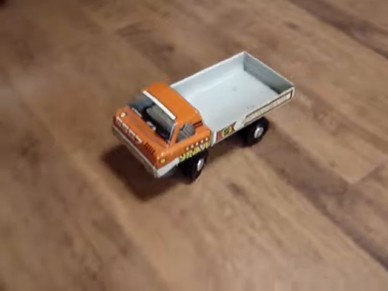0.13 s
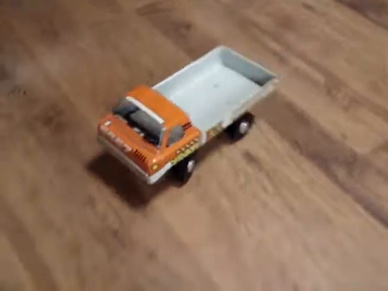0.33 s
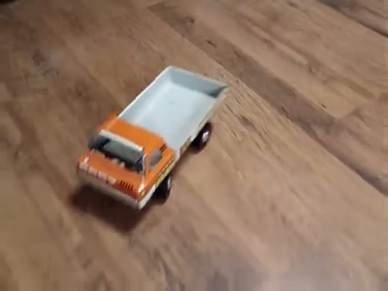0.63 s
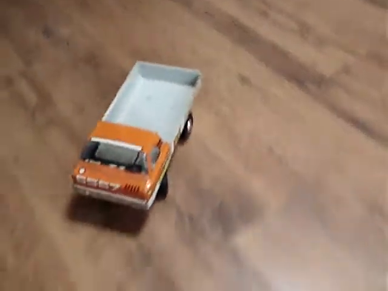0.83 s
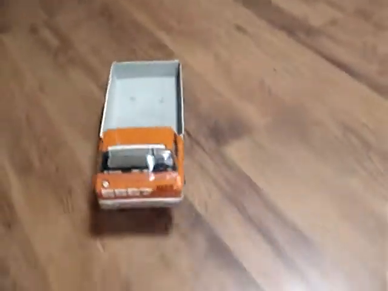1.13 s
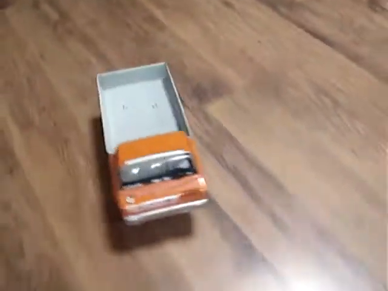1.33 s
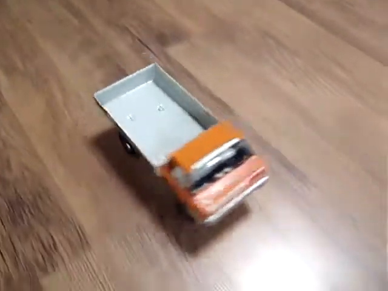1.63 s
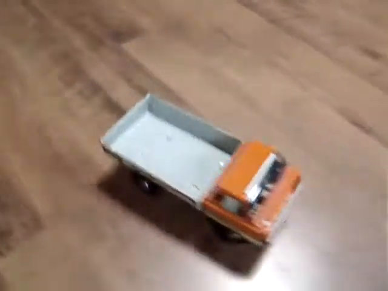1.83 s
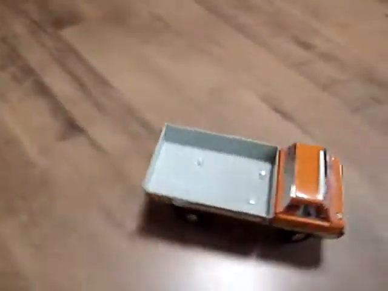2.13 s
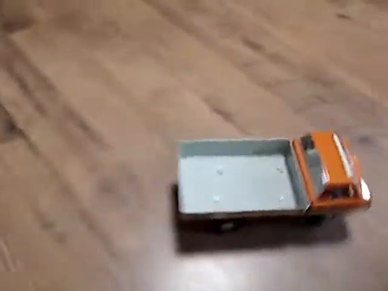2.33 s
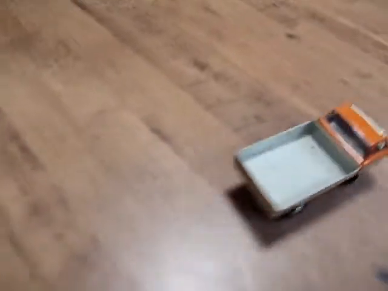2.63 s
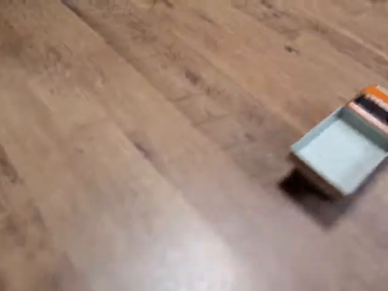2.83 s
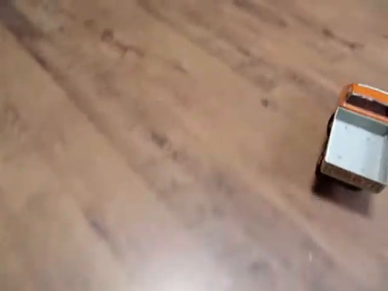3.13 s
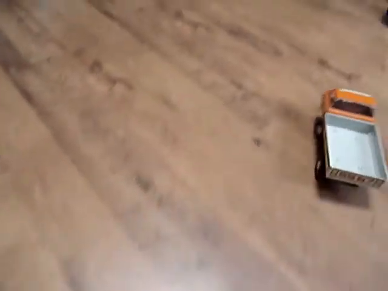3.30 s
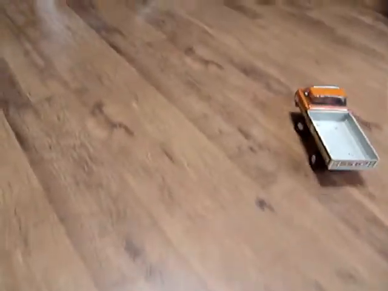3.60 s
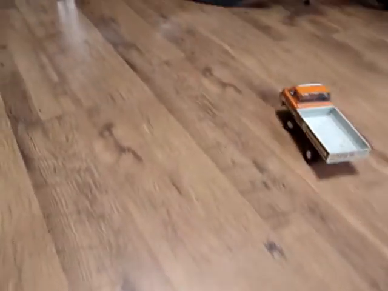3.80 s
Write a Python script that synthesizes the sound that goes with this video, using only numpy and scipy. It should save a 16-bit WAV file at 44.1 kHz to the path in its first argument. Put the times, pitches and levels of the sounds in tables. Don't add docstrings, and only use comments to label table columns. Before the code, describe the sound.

Steady clockwork whirr of a small tin truck, its hard wheels clattering over wooden boards.

```python
import sys
import numpy as np
from scipy import signal
from scipy.fft import rfft, irfft
from scipy.io import wavfile
from scipy.ndimage import uniform_filter1d

SR = 44100
rng = np.random.default_rng(int(sys.argv[2]) if len(sys.argv) > 2 else 0)


def output_pcm(signal):
    pcm = np.clip(np.atleast_2d(signal).T, -1, 1) * 32767
    wavfile.write(sys.argv[1], SR, np.round(pcm).astype(np.int16))


def volts_from_db(level):
    exponent = np.asarray(level, float) / 20
    return 10 ** exponent


N = 174636


def evened(x):
    return x / np.sqrt(np.mean(x ** 2) + 1e-20)


def coloured(x, points):
    hz, db = np.transpose(points)
    bins_hz = np.fft.rfftfreq(4096, 1 / SR)
    log_gain = np.interp(np.log(bins_hz + 1), np.log(hz), db) * np.log(10) / 20
    cepstrum = irfft(log_gain)
    cepstrum[1:2048] *= 2
    cepstrum[2049:] = 0
    impulse = irfft(np.exp(rfft(cepstrum)))
    return evened(signal.oaconvolve(x, impulse)[:N])


def wobble(seconds):
    size = max(int(seconds * SR), 2)
    noise = rng.standard_normal(N)
    return evened(uniform_filter1d(uniform_filter1d(noise, size), size))


def ring(drive, hz, width_hz):
    b, a = signal.iirpeak(hz, hz / max(width_hz, 25), SR)
    return evened(signal.lfilter(b, a, drive))


def knocks(per_s, spread_db):
    govern_s, govern_share = 0.02, 0.6
    chance, luck, side = rng.random((3, N))
    size_db = spread_db * np.minimum(-np.log(luck + 1e-9), 3.5)
    hits = evened((chance < per_s / SR) * np.sign(side - 0.5) * volts_from_db(size_db))
    force = abs(uniform_filter1d(hits ** 2, int(govern_s * SR)))
    return evened(hits / np.sqrt(govern_share * force + 1 - govern_share))


# frequency in Hz, level in dB.
TIN_COLOUR = [(500, -32), (900, 2.5), (1300, -1.5), (2500, 0), (2850, -7.5), (3500, -27), (4500, -37.5),
              (7000, -28.5)]


def tin_body(drive):
    return volts_from_db(-6) * coloured(drive, TIN_COLOUR)


# frequency in Hz, level in dB.
BOARD_COLOUR = [(30, -53.5), (170, -44.5), (260, -9.5), (380, 1.5), (550, 6), (850, 3), (1100, -1.5),
                (2500, -32.5)]


def floor_boards(drive, load):
    wheels = knocks(per_s=900, spread_db=2.5) * volts_from_db(0.5 * load) + 0.49 * drive
    return volts_from_db(-6.5) * coloured(wheels, BOARD_COLOUR)


# frequency in Hz, level in dB.
FIZZ_COLOUR = [(2400, -13), (3000, 0.5), (3950, -0.5), (4900, -11), (6800, -10), (8200, -7.5), (9400, -5.5),
               (10100, -25)]


def gear_fizz(load):
    ticks_db = 0.31 * load + 1.0 * wobble(0.0047)
    ticks = knocks(per_s=9000, spread_db=3.5) * volts_from_db(ticks_db)
    return volts_from_db(-14.5) * coloured(ticks, FIZZ_COLOUR)


# pitch in Hz, width in Hz, level in dB.
PANEL_MODES = [(395, 105, -23), (445, 49, -22.5), (515, 30, -22.5), (611, 22, -31), (743, 110, -21),
               (818, 15, -19.5), (1250, 180, -21), (1491, 120, -29), (1658, 20, -31.5), (1980, 35, -49),
               (2375, 240, -25.5), (2570, 73, -41), (3274, 120, -36), (3860, 28, -31)]
# centre in seconds, pitch in Hz, half length in seconds, level in dB.
PANEL_TURNS = [(0.296, 526, 0.33, -9), (0.135, 1480, 0.046, -13), (0.428, 780, 0.13, -16.5),
               (.49, 2330, .15, -20), (.51, 1980, 0.35, -17.5), (.6, 3200, 0.43, -37),
               (.64, 2570, 0.14, -21), (.8, 1570, 0.22, -23), (.87, 2315, 0.044, -12.5),
               (1.05, 3860, 0.38, -28), (1.023, 400, 0.18, -11), (1.018, 494, 0.087, -7.5),
               (1.103, 1742, 0.19, -16.5), (1.254, 2430, 0.11, -29), (1.35, 1520, 0.33, -15),
               (1.35, 520, 0.19, -24), (1.66, 2570, 0.27, -21), (1.8, 1487, 0.15, -12.5),
               (1.83, 810, 0.12, -16), (1.637, 1694, 0.24, -27), (2., 3460, 0.15, -21),
               (1.97, 576, 0.26, -18.5), (2.185, 438, 0.071, -6.5), (2.277, 2340, 0.16, -21),
               (2.324, 3290, 0.22, -20), (2.445, 802, .2, -11), (2.607, 478, 0.19, -14),
               (2.633, 1250, 0.12, -24), (2.72, 852, 0.32, -11.5), (2.683, 620, 0.08, -22),
               (2.69, 2270, 0.18, -29), (2.913, 3860, 0.14, -21.5), (2.99, 723, 0.13, -18),
               (3.095, 2400, 0.073, -25), (3.1, 1722, .3, -18.5), (3.215, 515, 0.17, -17),
               (3.39, 650, 0.12, -30), (3.554, 469, 0.33, -13), (3.51, 1720, 0.2, -28),
               (3.537, 3560, 0.38, -70), (3.745, 2475, 0.18, -15.5), (3.798, 3315, 0.12, -49),
               (3.9, 567, .12, -14), (3.92, 1734, 0.073, -11.5), (3.902, 2460, 0.073, -14.5)]


def panels(drive):
    steady_s, steady_share = 0.05, 0.7
    t = np.arange(N) / SR
    out = np.zeros(N)
    for hz, width_hz, db in PANEL_MODES:
        out += ring(drive, hz, width_hz) * volts_from_db(db)
    for centre_s, hz, half_s, db in PANEL_TURNS:
        song = ring(drive, hz, 20 + 0.012 * hz)
        power = abs(uniform_filter1d(song ** 2, int(steady_s * SR)))
        song = song / np.sqrt(steady_share * power + 1 - steady_share)
        out += song * volts_from_db(db) * np.exp(-((t - centre_s) / max(half_s, 0.05)) ** 2)
    return out


# time in seconds, size in dB.
JOINT_BLOWS = [(0.111, 25), (0.146, 20), (0.226, 25), (0.264, 19), (0.329, 21), (0.473, 19.5), (0.584, 21),
               (0.6202, 19), (0.629, 17.5), (0.868, 15), (0.9716, 19), (0.991, 24), (0.9997, 24),
               (1.0924, 20), (1.2293, 23), (1.2938, 22), (1.339, 19), (1.3718, 17), (1.4997, 19.5),
               (1.6107, 26), (1.6352, 22), (1.7033, 17), (1.9593, 17), (1.9677, 21.5), (2.0591, 21),
               (2.0674, 20), (2.2798, 20), (2.307, 19), (2.3666, 18), (2.6797, 23), (2.7527, 21),
               (2.7798, 14), (2.853, 22), (2.9777, 20), (3.0874, 22.5), (3.3532, 23), (3.4763, 22),
               (3.684, 21)]


def with_joints(drive):
    out = drive.copy()
    for s, db in JOINT_BLOWS:
        out[round(s * SR)] = -volts_from_db(db + 2)
    return out


# time in seconds, strength in dB, lull before in dB.
WHEEL_JOLTS = [(0.152, -16, 0.5), (0.31, -6.5, -25), (0.3764, -13, 0), (0.457, -8, -5), (0.6214, -9, -0.5),
               (0.771, 14, 1), (0.8554, -3, 6), (0.991, 8, 2.5), (1.0667, 7, 2.5), (1.1417, -2, 14),
               (1.3194, 0.5, -2.5), (1.3713, -12, 7), (1.4306, -14, -6), (1.499, -4, 5), (1.6077, -13, 8),
               (1.6825, -6, -5), (1.9094, -3.5, 6.5), (2.0367, -4, -1.5), (2.093, -5.5, -2), (2.2606, 1, 7),
               (2.444, -4, -8.5), (2.6696, -7, -4.5), (2.7796, -8.5, -5.5), (2.971, 2, 1),
               (3.0744, 2.5, -4.5), (3.2361, -8.5, -0.5), (3.3904, 5, -0.5), (3.5024, -13, 1.5),
               (3.648, 8, -9), (3.903, -8.5, 11)]
# time in seconds, strength in dB, lull before in dB.
MORE_JOLTS = [(0.2214, -11.5, -1.5), (0.807, -2.5, 2), (0.9313, -7.5, 11), (1.1034, -4.5, 10),
              (1.294, -2.5, -0.5), (1.6334, -17, 3), (1.73, -5.5, 3), (1.801, -1, -2), (1.832, -5.5, -4),
              (1.883, -5.5, -7.5), (2.3034, -4, 4), (2.3334, -2.5, -8.5), (2.6304, -8.5, -9.5),
              (2.877, -9.5, 8), (3.0104, -11, 1.5), (3.1584, -1.5, 1), (3.282, -13.5, -3.5),
              (3.3644, -11.5, 1), (3.4424, -16.5, -8), (3.572, -5, 7), (3.6944, -7, -2),
              (3.7744, -9.5, -2), (3.871, -13, 6)]


def load_db():
    slack_s, decay_s, lull_s = 0.0027, 0.018, 0.016
    t, out = np.arange(N) / SR, np.zeros(N)
    for s, db, lull_db in [*WHEEL_JOLTS, *MORE_JOLTS]:
        since_s = t - s + slack_s
        boost_db = np.clip(0.5 + 0.58 * (db + 11), 0, 7)
        rattle = boost_db * np.exp(-abs(since_s) / decay_s)
        lull = np.clip(lull_db, -12, 0) * np.exp(-(since_s / lull_s) ** 2)
        out += np.where(since_s > 0, rattle, lull)
    return uniform_filter1d(out, size=30)


# time in seconds, level in dB, tin against floor in dB, fizz in dB.
CLOCKWORK = [(.09, -16, 1, 5), (.55, -14, 0, 1.5), (.75, -15, 0, 1.5), (.87, -15, 2, 4),
             (1.02, -17.5, -0.5, 3), (1.25, -16, -2, 0.5), (1.6, -14.5, -2.5, -2.5), (1.8, -16, 1.5, 3.5),
             (2.07, -14.5, 2, 1.5), (2.22, -19, -1.5, 1.5), (2.3, -16.5, -1.5, 3), (2.7, -16, 0.5, 2),
             (3.08, -16.5, 2, 2), (3.3, -16.5, 1.5, 4), (3.54, -17.5, 4.5, 1.5), (3.63, -20, 0.5, 4.5),
             (3.7, -17.5, 3.5, 4.5), (3.96, -17, 1.5, 4)]


def truck():
    t = np.arange(N) / SR
    at_s, *columns = np.transpose(CLOCKWORK)
    level_db, tin_db, fizz_db = (np.interp(t, at_s, column) for column in columns)
    load = load_db() + 1 * wobble(0.023)
    drive = knocks(per_s=1900, spread_db=2) * volts_from_db(load)
    rung = panels(drive)
    drive = with_joints(drive)
    boards = volts_from_db(-tin_db / 2) * floor_boards(drive, load)
    tin = volts_from_db(tin_db / 2) * tin_body(drive)
    fizz = volts_from_db(fizz_db) * gear_fizz(load)
    return volts_from_db(level_db) * (boards + tin + rung + fizz)


def room(x):
    move_s, t60_s = 0.035, 0.25
    hop, out = round(move_s * SR), np.zeros(N)
    padded = np.r_[np.zeros(hop), x]
    slots = np.arange(120, 7000, 22)
    for start in range(-hop, N, hop):
        at = slots + rng.integers(0, 22, len(slots))
        taps = np.zeros(7100)
        taps[at] = rng.choice([-1., 1.], len(at)) * volts_from_db(-60 * at / SR / t60_s)
        taps = signal.lfilter([1], [1, -0.5], taps)
        part = padded[start + hop:start + 3 * hop]
        fade = np.sin(np.pi * np.arange(len(part)) / hop / 2)
        wet = signal.fftconvolve(part * fade, taps / np.linalg.norm(taps))
        first = max(start, 0)
        wet = wet[max(-start, 0):][:N - first]
        out[first:][:len(wet)] += wet
    return out


def scene():
    toy = truck()
    return (toy + volts_from_db(-9) * room(toy))[None]


# centre in seconds, length in seconds, lowest lost frequency in Hz.
TOP_DROPOUTS = [(0.157, 0.0073, 8700), (0.215, 0.0033, 6700), (0.24, 0.0098, 8800), (0.287, 0.009, 7800),
                (.302, 0.011, 5300), (0.441, 0.0081, 7440), (0.602, 0.0044, 7800), (0.648, 0.0087, 8650),
                (0.912, 0.0075, 8300), (0.943, 0.0095, 7400), (0.98, .007, 9000), (1.004, 0.0043, 9100),
                (1.19, 0.007, 8800), (1.202, 0.0039, 8300), (1.293, 0.0072, 8660), (1.425, 0.0047, 6400),
                (1.763, .007, 8340), (1.862, 0.0037, 7600), (2.128, 0.009, 8600), (2.25, 0.022, 8900),
                (2.329, 0.01, 8460), (2.43, 0.0078, 8950), (2.533, 0.0082, 8270), (2.731, 0.0042, 7900),
                (2.851, 0.022, 8800), (3.03, 0.0045, 7850), (3.118, .007, 8500), (3.284, 0.01, 8500),
                (3.411, 0.0079, 8300), (3.683, 0.0068, 8800), (3.798, 0.0073, 8800), (3.932, 0.0036, 8900)]
EDGE_HZ = 10090


def coarse_treble(x):
    split_hz, hole_db, hole_depth_db = 5100, -3.5, -40
    hz, t, z = signal.stft(x, SR, nperseg=256, noverlap=192)
    hz = hz[:, None]
    frames = z.shape[1]
    blocks = frames // 5 + 1

    def tiled(v):
        return np.kron(v, np.ones((129 // len(v), 5)))[:, :frames]

    tile = tiled(rng.standard_normal((43, blocks)))
    luck = tiled(rng.random((43, blocks)))
    top = tiled(rng.random((1, blocks)))
    power = uniform_filter1d(uniform_filter1d(abs(z) ** 2, size=15, axis=0), size=5, axis=1)
    usual = uniform_filter1d(power, size=120, axis=1)
    rel_db = 10 * np.log10(power / (usual + 1e-20) + 1e-12)
    height = np.clip((hz - split_hz) / (EDGE_HZ - split_hz), 0, 1)
    odd_tile = (0.065 + 0.18 * height) * volts_from_db(-rel_db) - luck
    whole_top = 0.1 * height ** 5 * volts_from_db(-rel_db) - top
    by_chance = np.maximum(odd_tile, whole_top) * 100
    hole = np.clip(np.maximum(by_chance, hole_db - rel_db), 0, 1)
    for s, length_s, low_hz in TOP_DROPOUTS:
        when = np.clip((length_s / 2 - abs(t - s)) * 700 + 0.5, 0, 1)
        where = np.clip((hz - low_hz) / 200 + 0.5, 0, 1)
        hole = np.maximum(hole, when * where)
    tile_db = (-1 + 2.8 * height) * tile
    flicker_db = 6 * height * (2 * top - 1.5)
    gain = volts_from_db(tile_db + flicker_db + hole_depth_db * hole)
    z = np.where(hz > split_hz, z * gain, z)
    return signal.istft(z, SR, nperseg=256, noverlap=192)[1][:N]


def low_pass(x):
    return signal.sosfilt(signal.butter(12, 10670, fs=SR, output="sos"), x)


def record(dry):
    ceiling, low_cut_hz, low_leak_db = 0.68, 314, -68
    hum_db, hush_db, start_s, open_s = -54, -89, 0.0765, 0.003
    x = ceiling * np.tanh(dry[0] / ceiling)
    low_cut = signal.butter(3, low_cut_hz, "high", fs=SR, output="sos")
    x = signal.sosfilt(low_cut, x) + volts_from_db(low_leak_db) * x
    hum_colour = [(20, -6.5), (60, -9.0), (150, -3.5), (250, -22.5)]
    x += volts_from_db(hum_db) * coloured(rng.standard_normal(N), hum_colour)
    opening = np.clip((np.arange(N) / SR - start_s) / open_s, 0, 1)
    x = coarse_treble(x) * np.sin(np.pi / 2 * opening) ** 2
    band_edge = signal.firwin(801, EDGE_HZ, window=("kaiser", 6), fs=SR)
    x = signal.oaconvolve(x, band_edge, "same")
    hush_colour = [(60, -5.5), (400, -28.0), (1500, -77.5)]
    x += volts_from_db(hush_db) * coloured(rng.standard_normal(N), hush_colour)
    return low_pass(x[None])


dry = scene()
out = record(dry)
output_pcm(out)
```